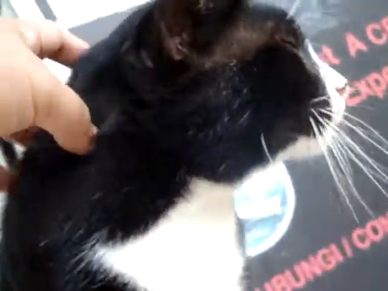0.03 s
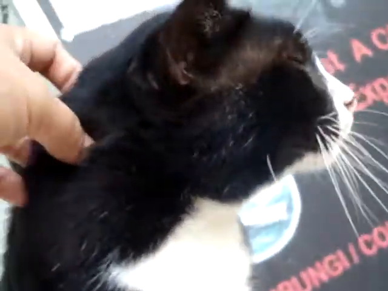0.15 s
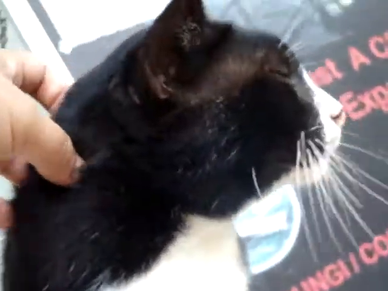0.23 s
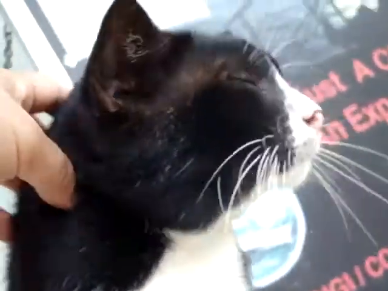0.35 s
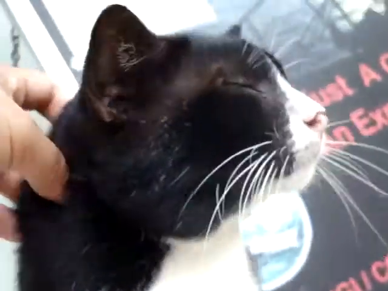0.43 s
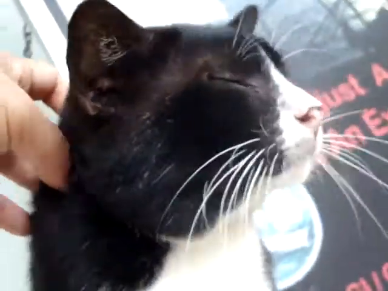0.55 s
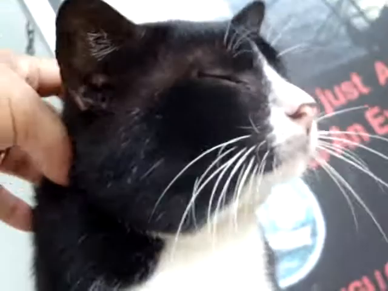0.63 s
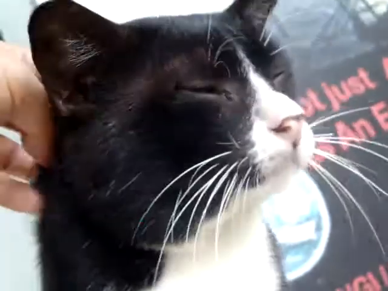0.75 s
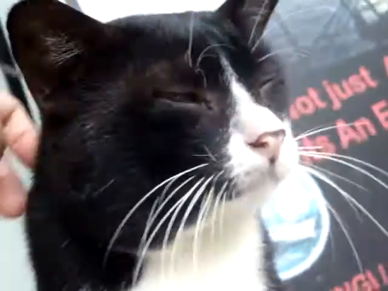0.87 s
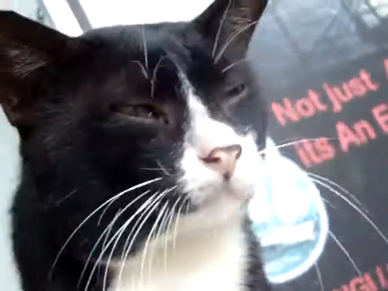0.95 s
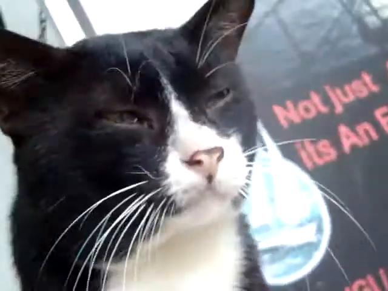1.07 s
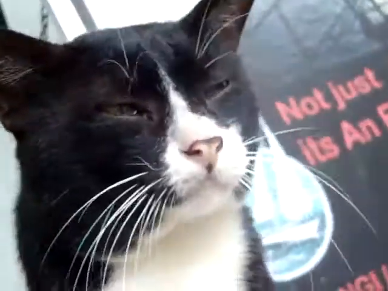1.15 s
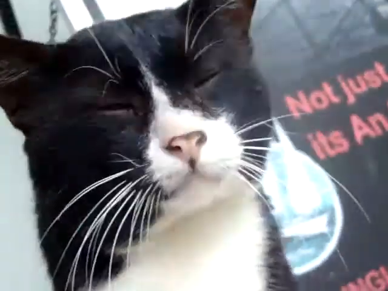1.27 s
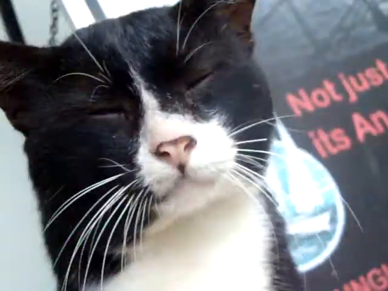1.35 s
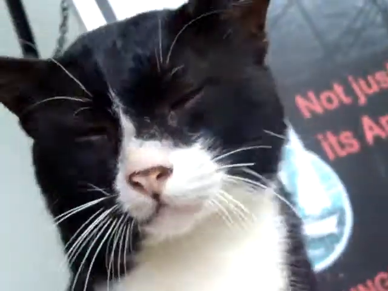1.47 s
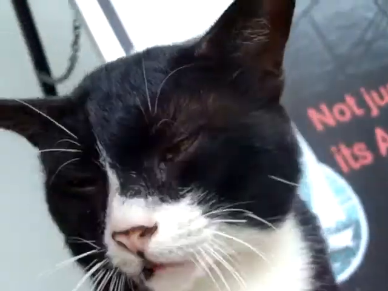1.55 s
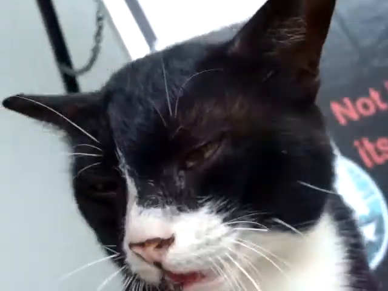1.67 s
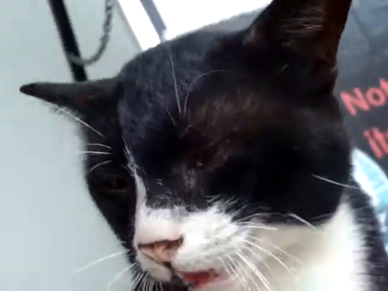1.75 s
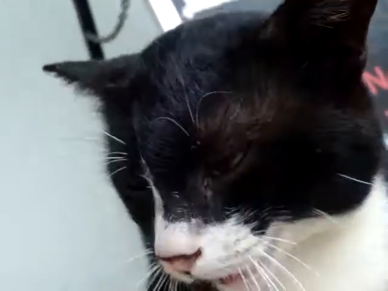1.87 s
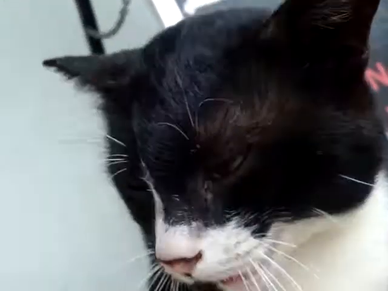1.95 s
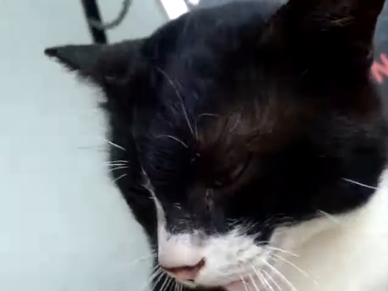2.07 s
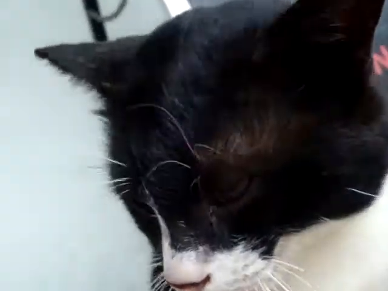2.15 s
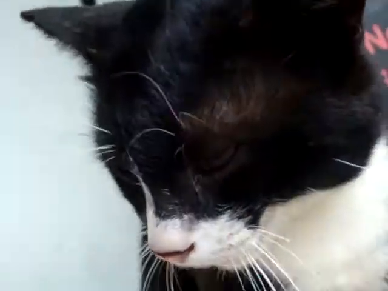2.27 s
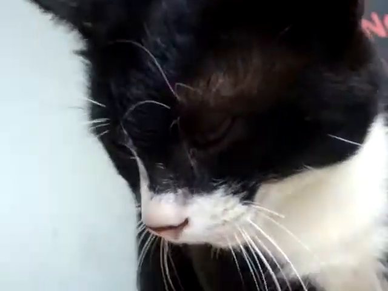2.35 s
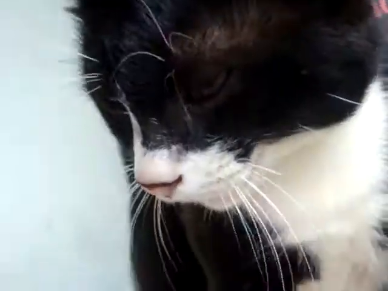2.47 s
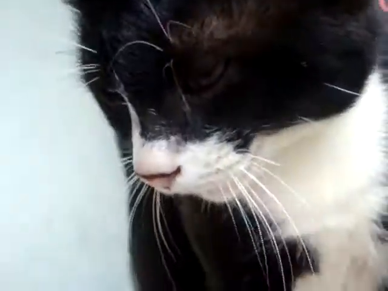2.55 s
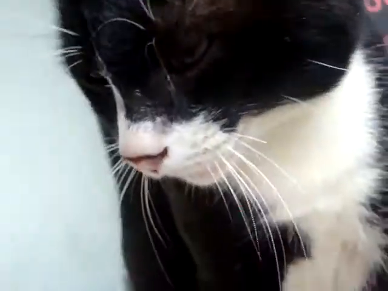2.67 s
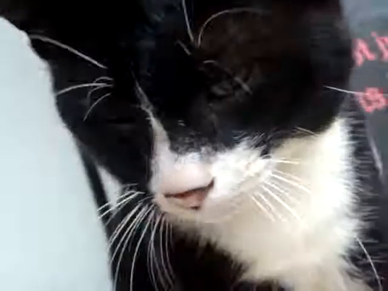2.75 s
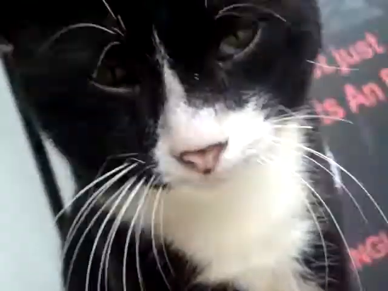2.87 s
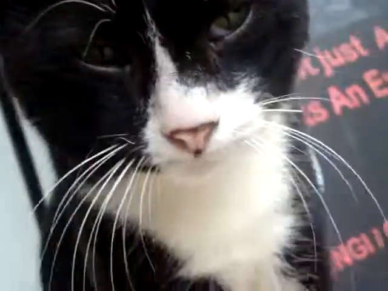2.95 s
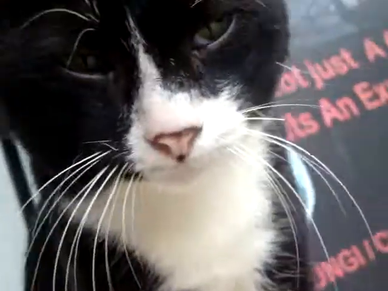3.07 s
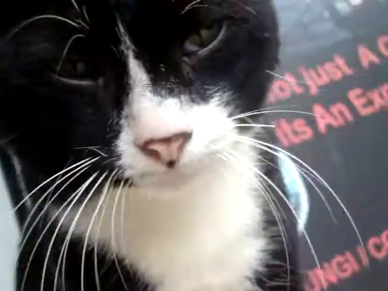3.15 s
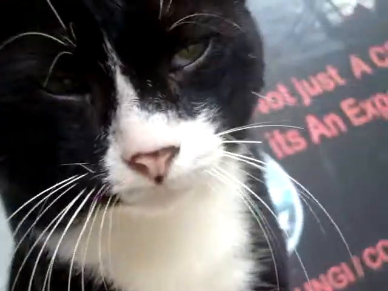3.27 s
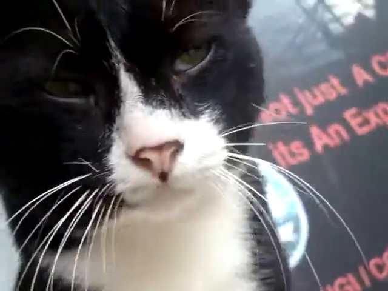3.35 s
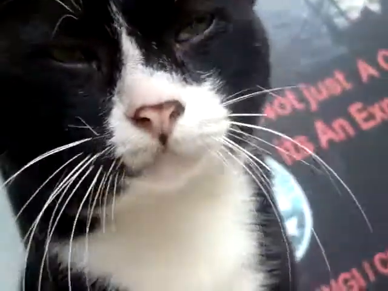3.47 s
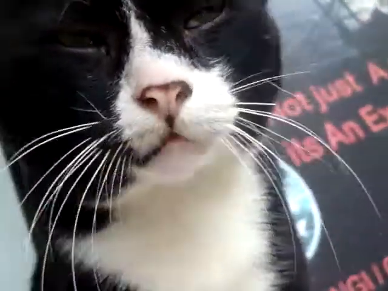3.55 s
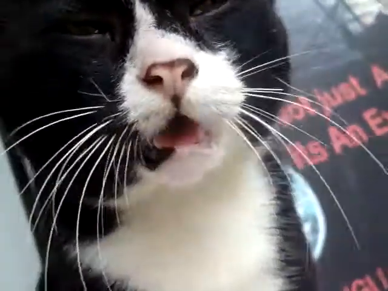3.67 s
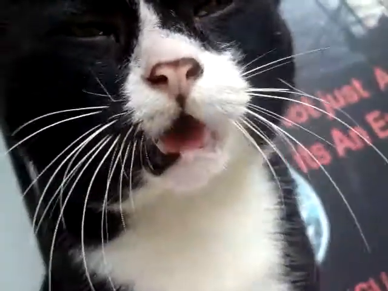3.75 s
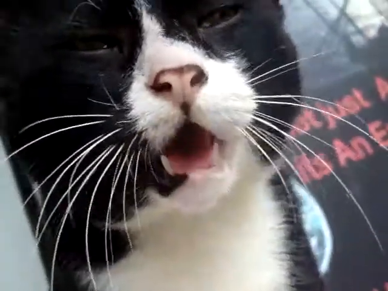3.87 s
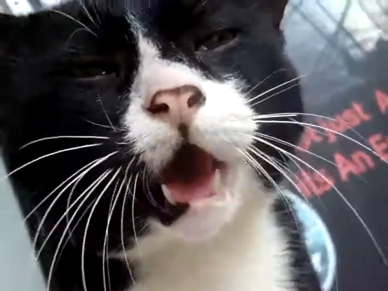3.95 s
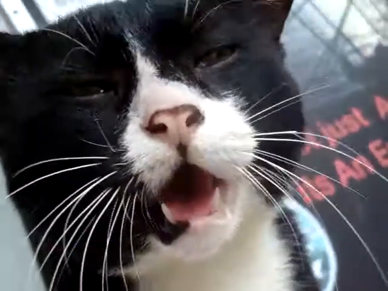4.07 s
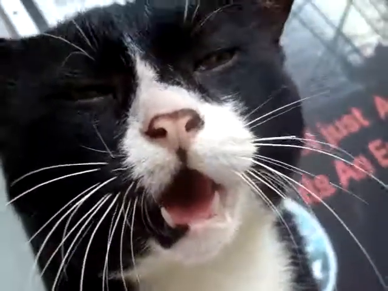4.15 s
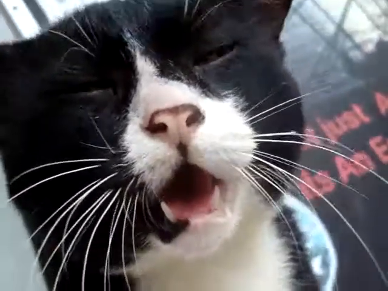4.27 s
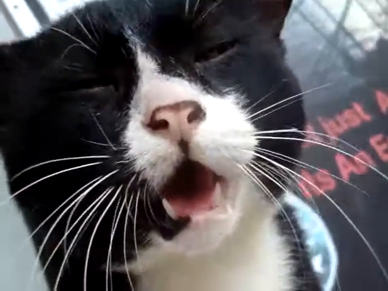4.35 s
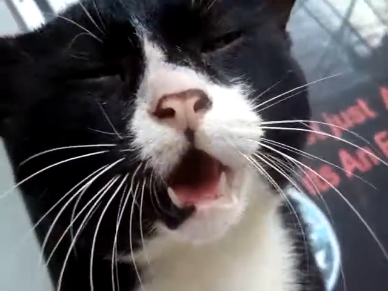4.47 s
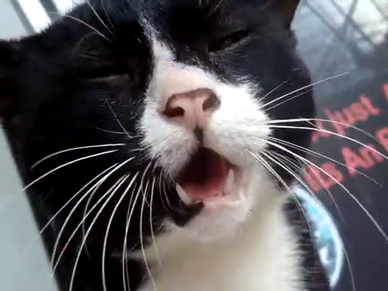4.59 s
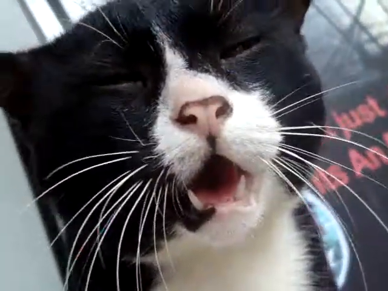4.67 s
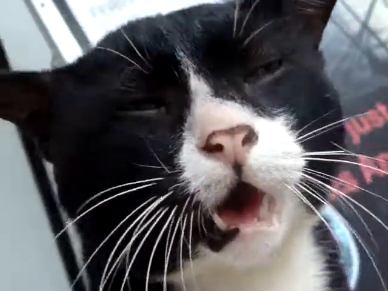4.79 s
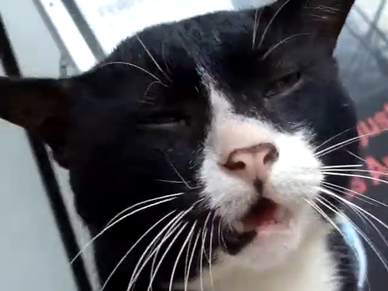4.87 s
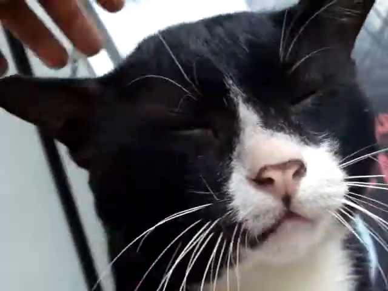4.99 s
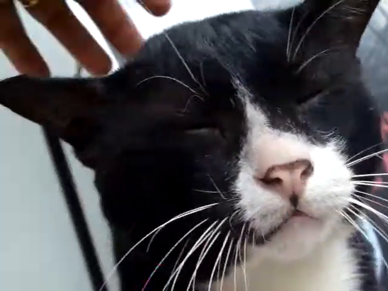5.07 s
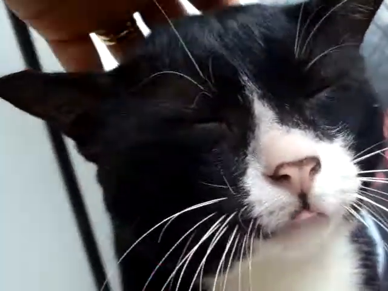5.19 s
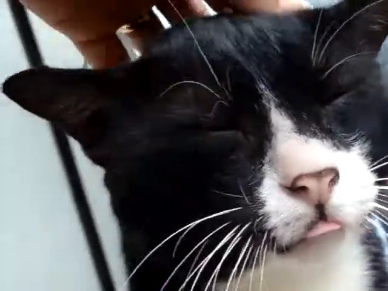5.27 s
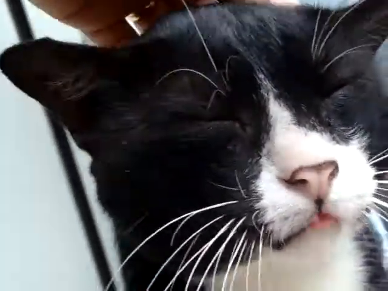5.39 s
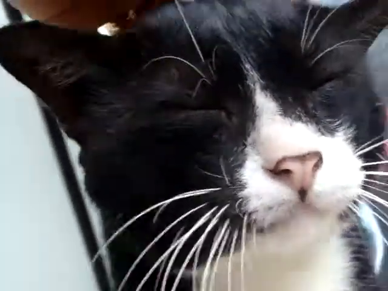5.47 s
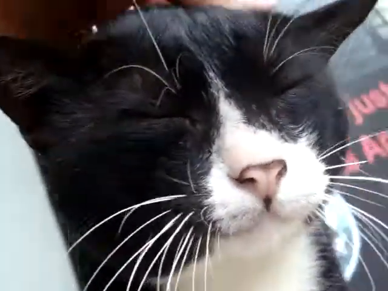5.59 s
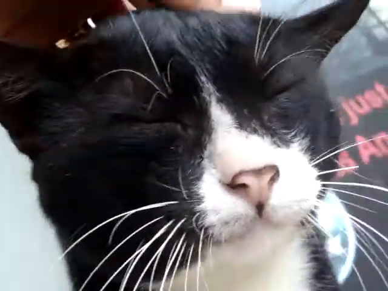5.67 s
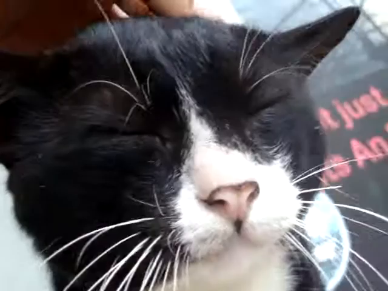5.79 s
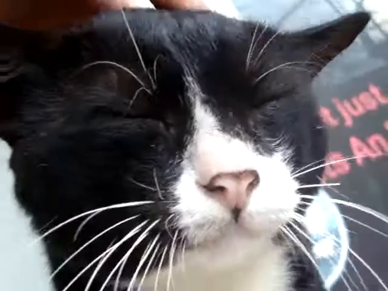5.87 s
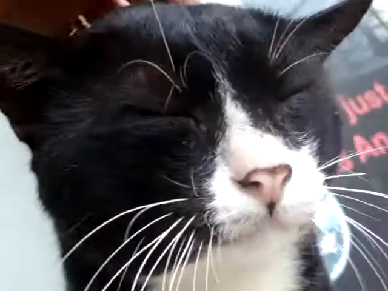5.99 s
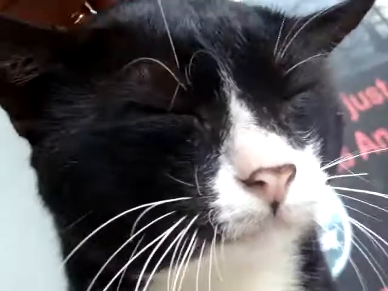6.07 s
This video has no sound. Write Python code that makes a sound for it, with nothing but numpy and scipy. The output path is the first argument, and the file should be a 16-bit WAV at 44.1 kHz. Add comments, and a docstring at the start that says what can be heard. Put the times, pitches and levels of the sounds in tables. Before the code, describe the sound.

A hand brushes softly through a cat's fur close to the microphone while a slow engine thuds faintly outside. The cat gives a long, half-closed meow that swells and tapers. The engine fades away, and the cat meows again, louder and wide open, its pitch dropping just after the start. Faint tyre noise then swells from a nearby road over a steady rush of air.

```python
"""Beside a cat, within earshot of a road. Outside, a slow single-cylinder engine thuds through its
exhaust and fades, and tyre noise swells. Up close, a hand brushes softly through the fur and the cat
gives two long meows, vocal-fold harmonics shaped by throat and mouth: the first with the mouth half
closed, the second wide open, its pitch breaking downward just after the start."""
import sys
import numpy as np
from scipy import signal
from scipy.fft import rfft, irfft, next_fast_len
from scipy.io import wavfile
from scipy.ndimage import uniform_filter1d

SR = 44100
rng = np.random.default_rng(int(sys.argv[2]) if len(sys.argv) > 2 else 0)


def master_out(mix):
    """Clip the mix to full scale and print it as 16-bit PCM to the path in sys.argv[1]."""
    frames = np.transpose(np.atleast_2d(mix))
    ceiling = np.clip(frames, -1, 1)
    pcm = np.round(ceiling * 32767).astype(np.int16)
    wavfile.write(sys.argv[1], SR, pcm)


N = 270465
TIME = np.arange(N) / SR


def undb(db):
    """Decibels to gain."""
    return 10 ** (np.asarray(db) / 20)


def unit(x):
    """Scale to rms 1."""
    return x / np.sqrt(np.mean(x ** 2))


def curves(table):
    """Each value column of a time table, interpolated per sample."""
    times_s, *columns = np.transpose(table)
    return [np.interp(TIME, times_s, column) for column in columns]


def colour_db(spectrum, hz):
    """Interpolate a spectrum on a log-frequency axis."""
    points_hz, points_db = np.transpose(spectrum)
    return np.interp(np.log(hz + 1e-9), np.log(points_hz), points_db)


def noise(spectrum):
    """Coloured noise, rms 1, rolled off below the first point."""
    size = next_fast_len(N)
    hz = np.fft.rfftfreq(size, 1 / SR)
    gain = undb(colour_db(spectrum, hz)) * np.minimum(hz / spectrum[0][0], 1) ** 2
    white = rfft(rng.standard_normal(size))
    return unit(irfft(white * gain, size)[:N])


def walk(rate_hz):
    """Smoothed random steps, rms 1."""
    hold = max(int(SR / rate_hz), 2)
    steps = np.repeat(rng.standard_normal(N // hold + 1), hold)
    return unit(uniform_filter1d(uniform_filter1d(steps, hold), hold)[:N])


def swells(table):
    """Gain of bell-shaped swells, summed in power."""
    bells = [undb(db) * np.exp(-((TIME - peak_s) / half_s) ** 2) for peak_s, half_s, db in table]
    return np.sqrt(sum(bell ** 2 for bell in bells))


def exhaust(pulses, modes):
    """Pulses ring the pipe's resonances, two band-pass stages each; rms 1."""
    ringing = 0
    for hz, width_hz, db in modes:
        band = signal.tf2sos(*signal.iirpeak(hz, hz / width_hz, SR))
        ringing = ringing + undb(db) * signal.sosfilt(np.vstack([band, band]), pulses)
    return unit(ringing)


def engine(scatter_db=.9, stray_s=.0001):
    """Each firing rings the exhaust and arrives several times by way of the walls."""
    # Idle speed. Each row: time in seconds, firings per second.
    idle = [(0, 15.55), (.85, 15.45), (1.1, 15.95), (2.5, 15.95), (3, 15.55), (6.2, 15.5)]
    # Sound paths between walls. Each row: delay in seconds, gain in dB.
    paths = [(0, 0), (.0102, 0), (.0198, -4.5), (.031, -14)]
    # Exhaust resonances, low and hollow. Each row: centre in Hz, stage width in Hz, relative level in dB.
    boom_modes = [(125, 51, -1), (239, 58, 6.5)]
    ring_modes = [(286, 79, 5.5), (375.4, 30, 0), (570, 52, -10.5)]
    # Loudness. Each row: time in seconds, boom level in dB, ring level in dB.
    levels = [(0, -46, -46.5), (.6, -47.5, -47), (.95, -50, -40), (1.42, -43.5, -44.5), (1.8, -47, -46.5),
              (2.15, -47.5, -39), (2.7, -46, -45.5), (3.6, -70, -53.5)]
    (firing_hz,), (boom_db, ring_db) = curves(idle), curves(levels)
    cycles = np.cumsum(firing_hz) / SR - .31
    fired_s = TIME[1:][np.diff(np.floor(cycles)) > 0]
    pulses = np.zeros(N)
    for delay_s, db in paths:
        scatter, stray = rng.standard_normal((len(fired_s), 2)).T
        arrival_s = fired_s + delay_s + stray_s * stray
        at = np.clip(arrival_s * SR, 0, N - 1).astype(int)
        pulses[at] += undb(db + scatter_db * scatter)
    return exhaust(pulses, boom_modes) * undb(boom_db) + exhaust(pulses, ring_modes) * undb(ring_db)


def outdoor_air(level_db=-41):
    """Steady background rush."""
    # Air spectrum. Each row: frequency in Hz, relative density in dB.
    spectrum = [(30, -40.5), (55, -30), (80, -16), (125, -10), (170, -11), (220, -9), (290, -5.5),
                (400, -7.5), (480, -8), (590, -3), (740, -9), (1250, -11), (1900, -16.5), (4100, -22),
                (10000, -34.5)]
    return noise(spectrum) * undb(level_db)


def traffic(flicker_db=.7):
    """Tyres on a road: noise that swells and flickers."""
    # Tyre spectrum. Each row: frequency in Hz, relative density in dB.
    spectrum = [(70, -37), (125, -12.5), (180, -18.5), (310, -15), (440, 5), (530, -11.5), (650, -1),
                (950, -2), (1280, -4.5), (1450, -5.5), (1630, -4), (2100, -14.5), (4000, -39.5)]
    # Traffic swells. Each row: peak time in seconds, half length in seconds, level in dB.
    passes = [(.42, 0.14, -44.5), (2.4, 1, -51.5), (5.05, 1, -39.5), (6, 0.45, -44)]
    return noise(spectrum) * swells(passes) * undb(flicker_db * walk(25))


def hand(grain_db=2.5):
    """Fingers slide through fur: a soft, grainy hiss per stroke."""
    # Fur spectrum. Each row: frequency in Hz, relative density in dB.
    spectrum = [(600, -17.5), (1800, 2.5), (3200, -3.5), (4300, 1.5), (6000, -5.5), (8000, -6.5),
                (10000, -19)]
    # Strokes. Each row: peak time in seconds, half length in seconds, level in dB.
    strokes = [(.1, 1, -52), (1.45, 0.41, -55), (2.65, 0.32, -47)]
    return noise(spectrum) * swells(strokes) * undb(grain_db * walk(90))


def meow(pitch, level, mouth, width_hz, tilt_db, rasp_db, waver, jitter, shimmer_db, flutter_db, trim_db):
    """Vocal-fold harmonics pass the throat and one moving mouth resonance; turbulence adds rasp."""
    # Jaw, dropping in the second meow. Each row: time in seconds, opening from 0 to 1.
    jaw = [(2.6, 0.7), (3.72, 0.56), (3.81, 0.52), (3.86, 1)]
    # Throat response, jaw nearly shut and wide open. Each row: frequency in Hz, relative gain in dB.
    throat_shut = [(700, 5), (1420, -7), (2150, 2.5), (2870, 11.5), (3400, 19.5), (3600, -0.5),
                   (4250, -20.5), (5000, 4), (5700, -29.5), (7000, -25.5), (10000, -45.5)]
    throat_open = [(600, 2), (1220, 3), (1830, 0), (2420, 1), (3000, -3), (3500, -15), (3750, -7),
                   (4250, -13.5), (4850, -15), (5500, -6), (6200, -8), (7200, -22.5), (8500, -27),
                   (9400, -16), (10500, -27)]
    # Turbulence spectrum. Each row: frequency in Hz, relative density in dB.
    turbulence = [(300, -3.5), (900, -6), (1600, -2.5), (2400, 9), (3100, 0), (4400, -15), (5500, -1),
                  (6400, -7), (7300, -18), (8500, -24.5), (9400, -15.5), (10500, -50.5)]
    (hz,), (level_db,), (mouth_hz,), (opening,) = map(curves, (pitch, level, mouth, jaw))
    start_s, end_s = level[0][0], level[-1][0]
    on = (TIME > start_s) & (TIME < end_s)
    # Effort brightens the voice and clears the rasp; the folds also settle with time.
    easy_db, settle_db_per_s = -18, 2.5
    effort_db = level_db[on] - easy_db
    slope_db_per_octave = tilt_db + .1074 * effort_db
    hiss_db = rasp_db - .67 * effort_db - settle_db_per_s * (TIME[on] - start_s)
    hz = hz * (1 + waver * walk(70) + jitter * walk(600))
    phase = 2 * np.pi * np.cumsum(hz[on]) / SR
    harmonic = np.arange(1, 18)[:, None]
    partial_hz = harmonic * hz[on]
    shut_db, open_db = colour_db(throat_shut, partial_hz), colour_db(throat_open, partial_hz)
    throat_db = (1 - opening[on]) * shut_db + opening[on] * open_db
    resonance = 1 / (1 + 2j * (partial_hz - mouth_hz[on]) / width_hz)
    # Uneven fold closure unsettles high harmonics most, in strength and timing.
    unrest = np.minimum(harmonic / 10, 1)
    swing_db = flutter_db * unrest * np.array([walk(35)[on] for _ in harmonic])
    slip_rad = .025 * unrest * np.array([walk(150)[on] for _ in harmonic])
    partials = resonance * undb(throat_db + slope_db_per_octave * np.log2(harmonic) + swing_db)
    overtone_rms = np.sqrt(np.sum(abs(partials[1:]) ** 2, axis=0) / 2)
    voice = np.zeros(N)
    voice[on] = np.sum(partials * np.exp(1j * harmonic * (phase + slip_rad)), axis=0).real / overtone_rms
    # Air hisses through the folds in each open phase.
    voice[on] += undb(hiss_db) * noise(turbulence)[on] * (1 + .5 * np.cos(phase))
    fade = np.clip(np.minimum(TIME - start_s, end_s - TIME) / .003, 0, 1)
    return voice * fade * undb(level_db + trim_db + shimmer_db * walk(110))


def cat():
    """A half-closed meow, then a wide open one."""
    # Fold pitch. Each row: time in seconds, pitch in Hz.
    arching_pitch = [(1.48, 663.8), (1.516, 630.9), (1.534, 673.6), (1.542, 658.0), (1.57, 702.6),
                     (1.592, 692.3), (1.62, 727.1), (1.65, 702.0), (1.67, 730.8), (1.692, 693.8),
                     (1.738, 717.2), (1.774, 699.2), (1.792, 712.5), (2.024, 722.0), (2.478, 697.8),
                     (2.575, 679.8)]
    breaking_pitch = [(3.737, 682), (3.809, 700), (3.84, 680), (3.845, 633), (4.0, 618), (4.08, 622),
                      (4.17, 602), (4.28, 601), (4.36, 610), (4.57, 587), (4.82, 579), (4.833, 660)]
    # Vocal effort. Each row: time in seconds, level before trim in dB.
    first_level = [(1.475, -49), (1.481, -41), (1.537, -28.5), (1.669, -30), (1.775, -19), (1.871, -23),
                   (1.891, -21.5), (2.021, -21), (2.319, -30.5), (2.385, -27.5), (2.533, -31.5),
                   (2.6, -47.5)]
    second_level = [(3.718, -60), (3.724, -31.5), (3.812, -15.5), (3.856, -20.5), (3.964, -18),
                    (4.514, -17.5), (4.716, -22), (4.786, -22), (4.855, -39)]
    # Mouth, quick to open and slow to close. Each row: time in seconds, resonance in Hz.
    first_mouth = [(1.5, 1250), (1.63, 1570), (1.71, 1990), (1.88, 2400), (2.06, 2180), (2.2, 2000),
                   (2.6, 1850)]
    second_mouth = [(3.72, 1520), (3.78, 2040), (3.87, 2350), (4.07, 2490), (4.85, 2225)]
    first = meow(arching_pitch, first_level, first_mouth, width_hz=297, tilt_db=1.3, rasp_db=-27.5,
                 waver=.0046, jitter=.0034, shimmer_db=.78, flutter_db=3.0, trim_db=-.17)
    second = meow(breaking_pitch, second_level, second_mouth, width_hz=342, tilt_db=-.45, rasp_db=-21.5,
                  waver=.0039, jitter=.0037, shimmer_db=.42, flutter_db=2.5, trim_db=-.2)
    return first + second


def room(source, t60_s=.51, gain_db=-24):
    """Nearby walls return a short, weak scatter."""
    t = TIME[:SR // 2]
    decay = np.exp(-np.log(1000) * t / t60_s)
    tail = rng.standard_normal(len(t)) * decay * (t > .003)
    return undb(gain_db) * signal.fftconvolve(source, tail / np.linalg.norm(tail))[:N]


def scene():
    """Mono mix: cat and hand up close, engine, air and traffic behind."""
    voice = cat()
    outside = engine() + outdoor_air() + traffic()
    return (voice + room(voice) + hand() + outside)[None]


def record(dry):
    """Steep elliptic low-pass on the mix."""
    cutoff_hz = 10100
    return signal.sosfilt(signal.ellip(12, .2, 70, cutoff_hz, fs=SR, output="sos"), dry)


dry = scene()
out = record(dry)
master_out(out)
```